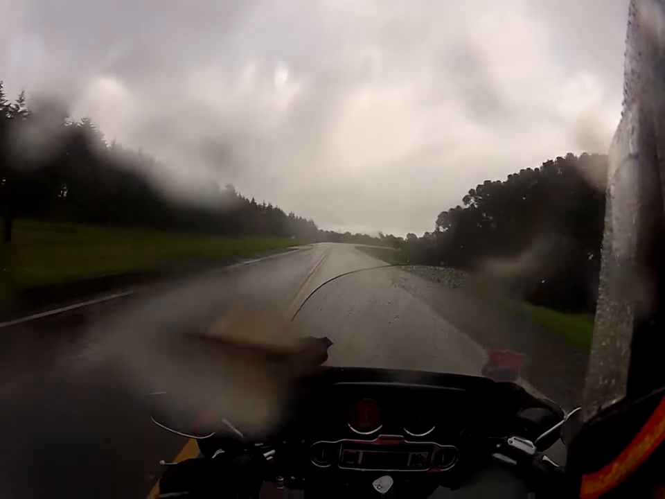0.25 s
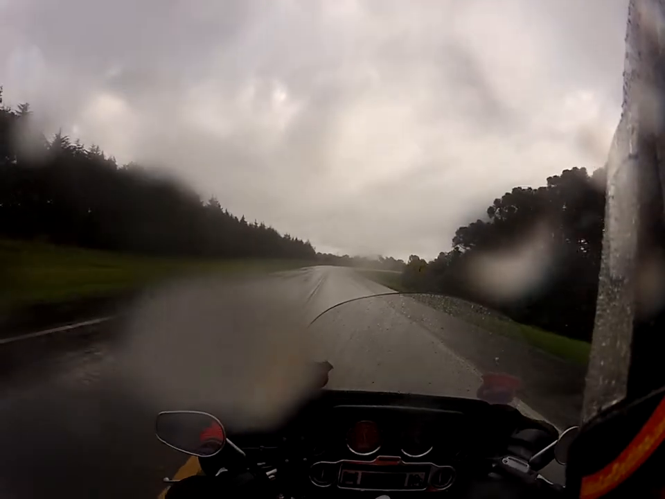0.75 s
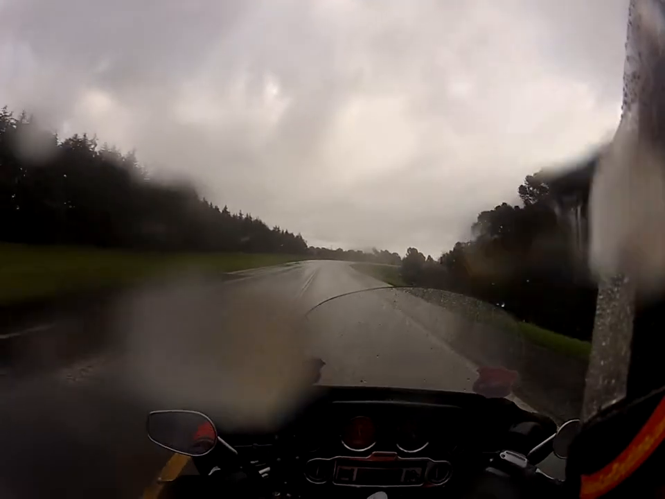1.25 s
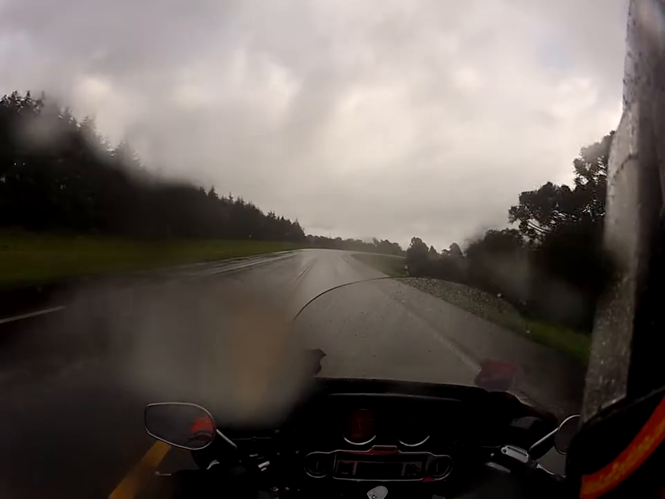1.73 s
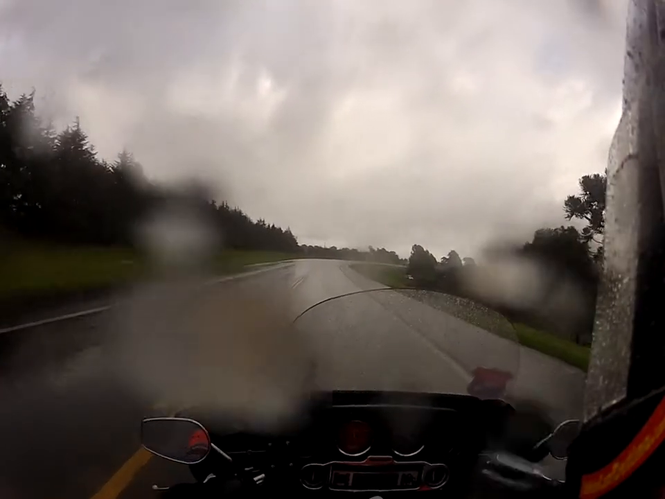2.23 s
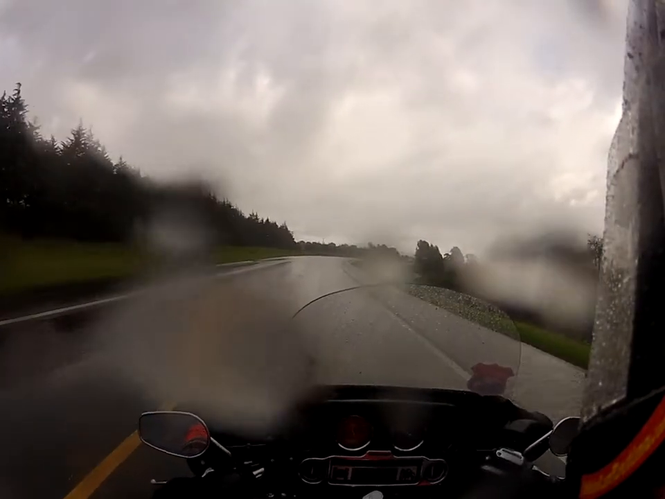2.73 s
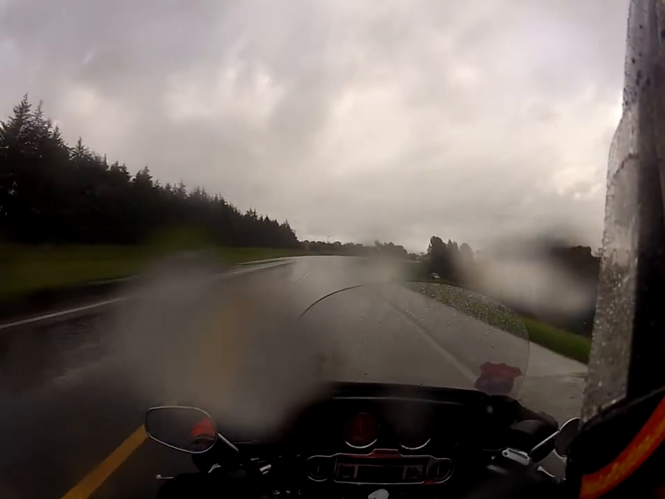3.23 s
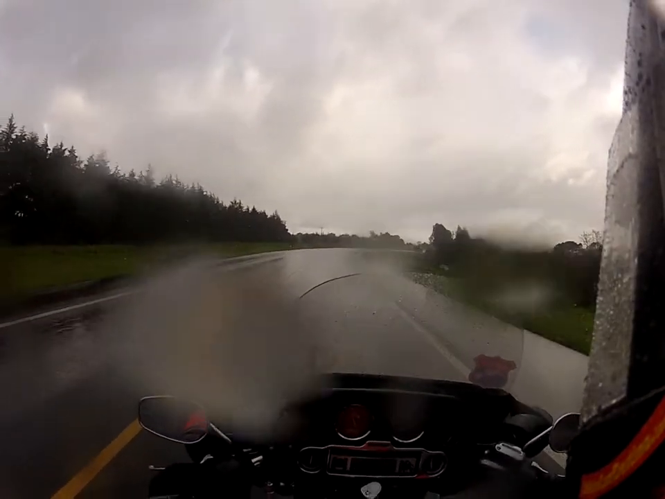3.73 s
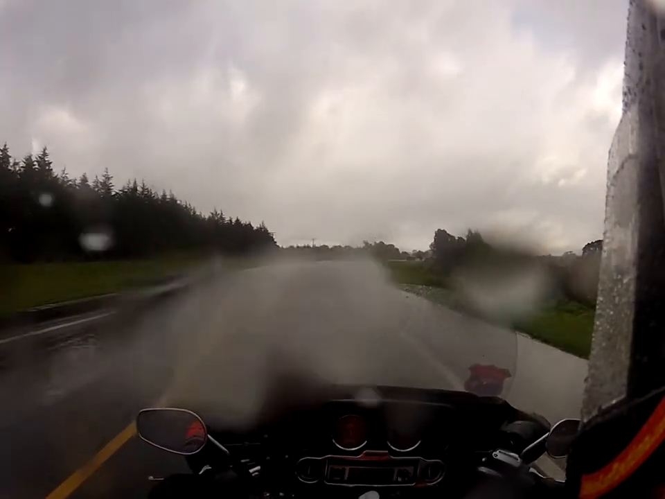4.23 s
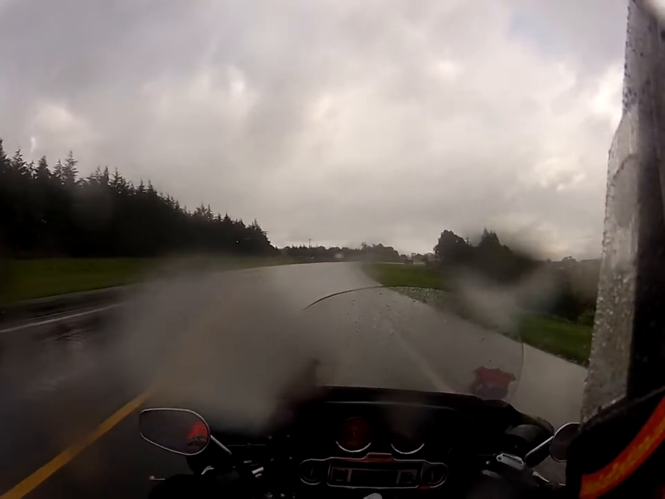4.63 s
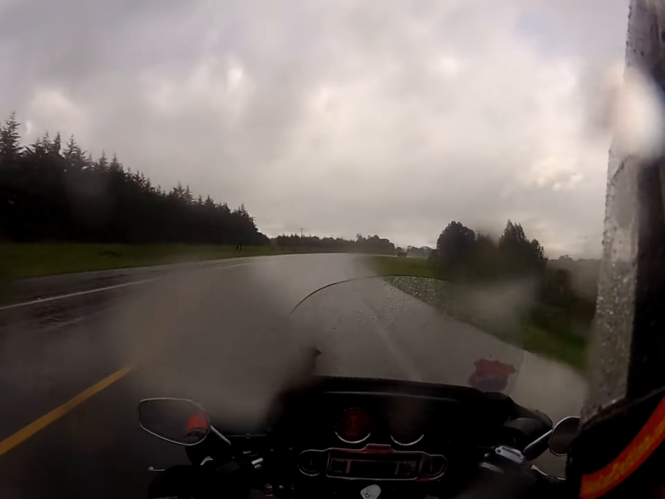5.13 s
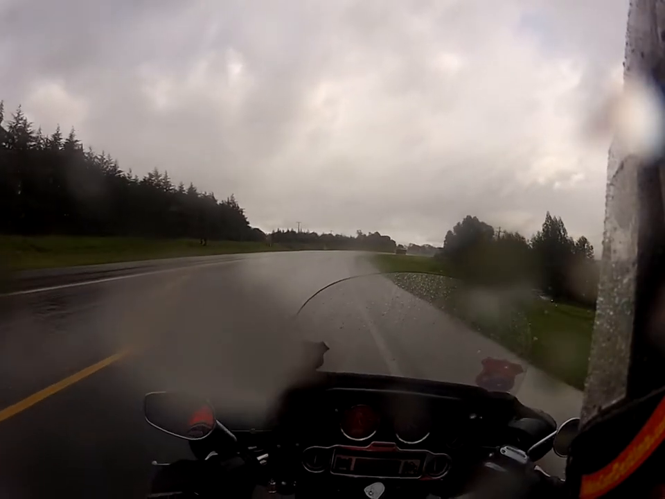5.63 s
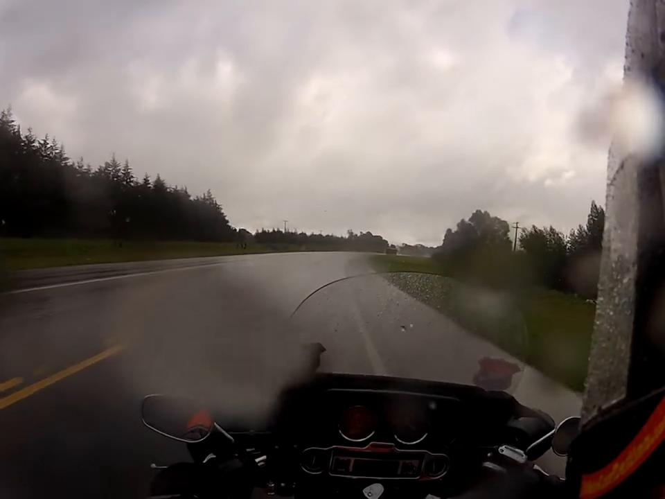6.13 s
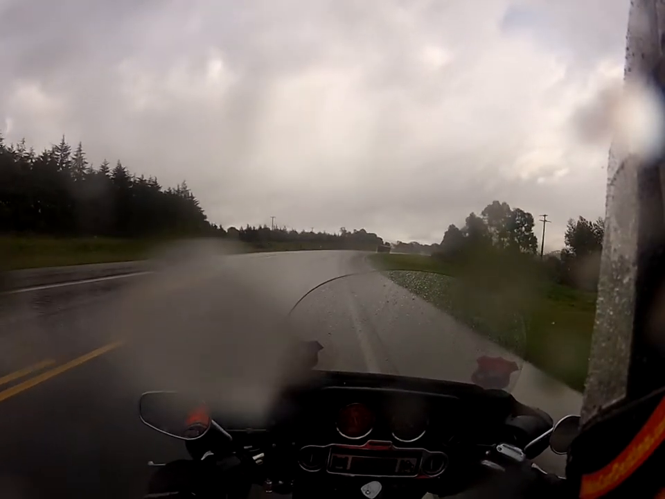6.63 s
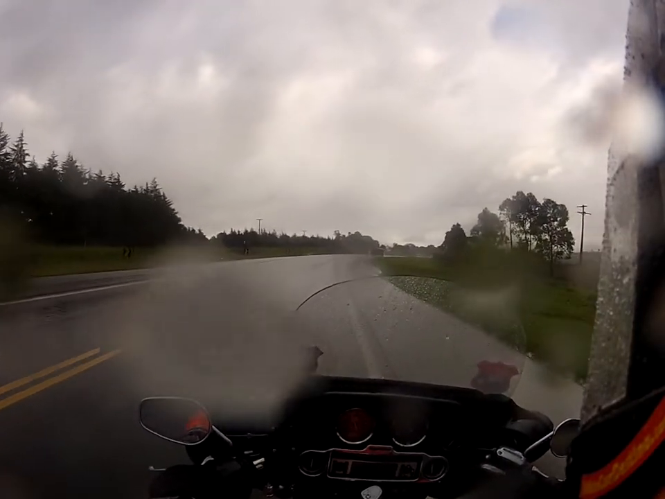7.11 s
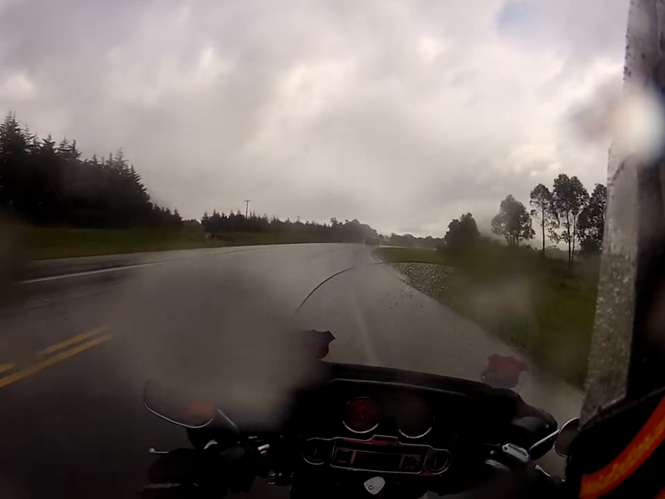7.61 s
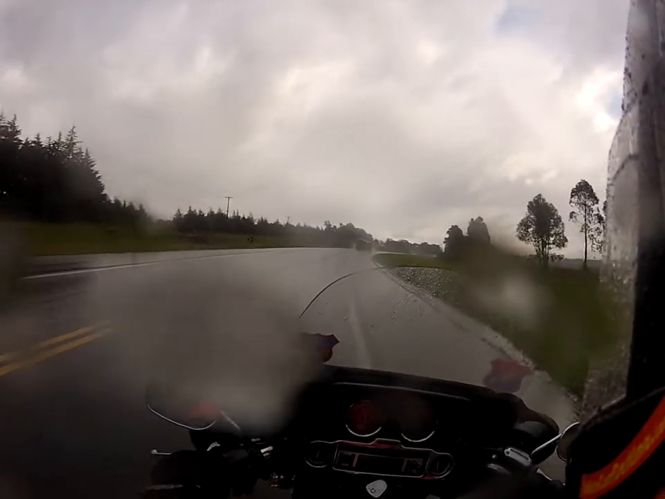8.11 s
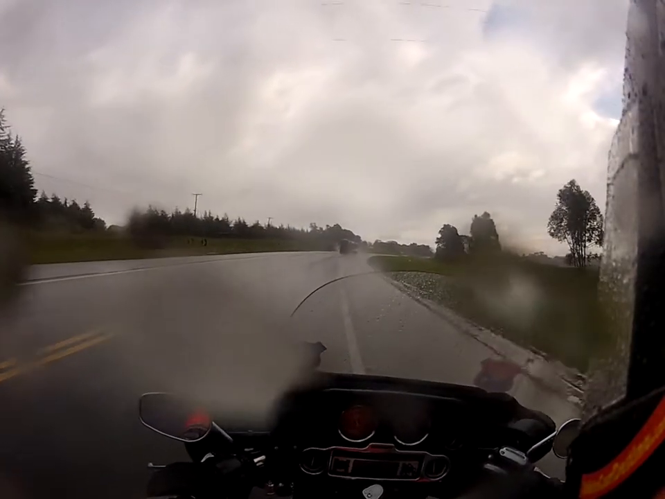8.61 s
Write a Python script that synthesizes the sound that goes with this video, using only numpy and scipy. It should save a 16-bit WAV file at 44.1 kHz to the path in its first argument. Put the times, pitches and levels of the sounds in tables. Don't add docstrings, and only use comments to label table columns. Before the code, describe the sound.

A big twin-cylinder motorcycle cruises on a wet open road, heard from a microphone sealed in a plastic case on the bike. Throughout, a low engine hum around 100 to 150 Hz sits with lumpy wind rumble, a deep 33 Hz fluttering throb, and steady spray hiss. From 0 to 2.5 s rain is dense: sharp hollow ticks, bright specks and dull mount knocks, with a violent slam at 1.2 s and a weaker one near 1.5. Engine load eases around 2 s and its pitch sinks slightly until 4 s. Hard slams hit at 2.8 and 3.25 s, each overload briefly ducking everything. Rain eases, picks up near 4 s, then thins after 5, leaving scattered taps and stronger engine drone. A small cluster of loud drops comes around 7.4 s; the ride continues to about 8.9 s. The tone is boxy, clipped and gritty.

```python
import sys
import numpy as np
from scipy import signal
from scipy.io import wavfile
from scipy.ndimage import uniform_filter1d

SR = 44100
rng = np.random.default_rng(int(sys.argv[2]) if len(sys.argv) > 2 else 0)


def log_audio(samples):
    frames = np.atleast_2d(samples).T
    limited = np.clip(frames, -1, 1)
    pcm = np.round(limited * 32767).astype(np.int16)
    wavfile.write(sys.argv[1], SR, pcm)


def gain_from_db(level_db):
    decades = np.asarray(level_db, float) / 20
    return 10 ** decades


N = 390726

# start_s [s], small_drops_db [dB]
RAIN_STRENGTH = [
    (0.0, -34.5),
    (2.3, -34.5),
    (2.9, -39),
    (3.9, -35.5),
    (4.9, -39),
    (6.9, -38),
    (8.86, -38.5),
]


def rms_one(x):
    return x / np.sqrt(np.mean(x ** 2) + 1e-20)


def in_time(rows):
    s, *columns = np.transpose(rows)
    return [np.interp(np.arange(N) / SR, s, column) for column in columns]


def drift(rate_hz):
    r = np.exp(-80 * np.pi * rate_hz / SR)
    slow = signal.lfilter([1], [1, -2 * r, r * r], rng.standard_normal(N // 40 + 2002))
    slow = rms_one(slow[2000:])
    return np.interp(np.arange(N) / 40, np.arange(len(slow)), slow)


def resonance(x, hz, width_hz):
    r = np.exp(-np.pi * width_hz / SR)
    poles = [1, -2 * r * np.cos(2 * np.pi * hz / SR), r * r]
    return signal.lfilter([(1 - r * r) / 2, 0, (r * r - 1) / 2], poles, x)


def modes(taps, table):
    out = 0
    for k, (hz, width_hz, db) in enumerate(table):
        out = out + gain_from_db(db) * (-1) ** k * resonance(taps + 1e-18, hz, width_hz)
    return out


def banded_noise(spectrum, patchy_db, shared, rate):
    hz, level_db = np.transpose(spectrum)
    edges = hz[1] * .7 * 2 ** np.arange(0, np.log2(hz[-2] / hz[1]) + 1, 1 / 3)
    out, together, white = 0, drift(rate), rng.standard_normal((2, N))
    for k, (low, high) in enumerate(zip(edges, edges[1:])):
        band_filter = signal.butter(2, [low, high], "band", fs=SR, output="sos")
        band = signal.sosfilt(band_filter, white[k % 2])
        centre_db = np.interp(np.log(low * high) / 2, np.log(hz), level_db)
        flicker_db = patchy_db * (shared * together + drift(rate))
        out = out + band * gain_from_db(centre_db + flicker_db)
    return rms_one(out)


def gusts():
    # peak_s [s], throb_db [dB], build_up_s [s], shedding_hz [Hz]
    gust_table = [(0.11, -20, 0.054, 32), (0.61, -15.5, 0.099, 32.24), (0.84, -19.9, 0.034, 32.2),
                  (1.0, -16.2, 0.036, 33.55), (1.14, -14, 0.039, 32), (1.3, -22, 0.091, 34.64),
                  (1.51, -14.5, 0.03, 33.2), (1.78, -17.5, 0.2, 33.1), (2.08, -24, 0.065, 32.5),
                  (2.35, -21.5, 0.12, 31.9), (2.64, -12, 0.097, 34.43), (3.0, -34, 0.033, 32.7),
                  (3.11, -20.5, 0.18, 33.45), (3.38, -21, 0.03, 35.87), (3.69, -23, 0.081, 33.24),
                  (3.93, -17.5, 0.043, 31.55), (4.23, -28, 0.12, 32.54), (4.63, -29.2, 0.32, 34.47),
                  (5.01, -23.5, 0.084, 37.62), (5.58, -25, 0.16, 33.14), (5.89, -22, 0.026, 32.54),
                  (6.1, -28, 0.1, 34.46), (6.45, -20, 0.063, 30.53), (6.72, -25, 0.074, 31.86),
                  (7.09, -18.5, 0.088, 35.3), (7.26, -18, 0.023, 34.83), (7.83, -21.3, 0.032, 33.7),
                  (8.05, -21, 0.22, 34.2), (8.4, -17.5, 0.11, 33.3), (8.69, -17.5, 0.024, 34.8)]
    collapse_share, lull_db = 0.73, -28.5
    peak_s, peak_db, build_s, shed_hz = np.transpose(gust_table)
    t = np.arange(0, N + 64, 64) / SR
    age = (t[:, None] - peak_s) / np.maximum(build_s, .02)
    age = np.where(age > 0, age / collapse_share, age)
    throb = (gain_from_db(peak_db) * np.exp(-age ** 2 / 2)).sum(axis=1) + gain_from_db(lull_db)
    rate_hz = np.interp(t, np.sort(peak_s), shed_hz)
    return in_time(np.transpose([t, rate_hz, 20 * np.log10(throb)]))


def wind():
    # pitch_hz [Hz], level_db [dB per Hz]
    rumble_colour = [(14, -34), (24, -6), (48, -4.5), (62, -6), (85, -12), (230, -22), (330, -27.5),
                     (425, -26.5), (600, -39.5), (750, -30.5), (1000, -86)]
    rumble_db = -27.5
    shed_hz, throb_db = gusts()
    turn = 2 * np.pi * np.cumsum(shed_hz * (1 + 0.0401 * drift(7.6))) / SR
    throb = np.sqrt(2) * np.sin(turn) * gain_from_db(throb_db + 2.7 * drift(9.7))
    swell_db = 0.13 * (throb_db - throb_db.mean())
    rumble = banded_noise(rumble_colour, patchy_db=2.0, shared=0.74, rate=14.2)
    return throb + gain_from_db(rumble_db + swell_db) * rumble


def engine():
    # start_s [s], cycle_hz [cycles per s]
    firing_cycle = [
        (0, 22.4),
        (1.2, 22.2),
        (2.0, 21.7),
        (3.2, 21.0),
        (4.0, 20.6),
        (5.6, 20.6),
        (7.2, 21.0),
        (8.86, 21.15),
    ]
    # [dB, level of the fifth multiple]
    engine_load = [
        (0.0, -35.5),
        (0.98, -35),
        (1.96, -43.5),
        (2.94, -38.5),
        (3.92, -38),
        (4.9, -35),
        (6.86, -34),
        (8.86, -34),
    ]
    # multiple [of the cycle], level_db [dB beside the load level]
    other_multiples = [(3, -1), (4, -6), (6, -15), (8, -14.5), (9, -11.5), (10, -12.5), (11, -14.5),
                       (12, -15), (14, -16.5), (20, -18.5)]
    (cycle_hz,), (fifth_db,) = in_time(firing_cycle), in_time(engine_load)
    seventh_db = fifth_db - 3.5
    turn = 2 * np.pi * np.cumsum(cycle_hz) / SR
    out = gain_from_db(fifth_db + 1.2 * drift(5)) * np.sin(5 * turn)
    out += gain_from_db(seventh_db + 1.2 * drift(5)) * np.sin(7 * turn)
    load_db = (fifth_db + seventh_db) / 2
    for multiple, db in other_multiples:
        wobble = rng.uniform(0, 2 * np.pi) + 0.36 * drift(3.7)
        out += gain_from_db(load_db + db + 3.5 * drift(7.5)) * np.sin(round(multiple) * turn + wobble)
    return np.sqrt(2) * out


def case(taps):
    # pitch_hz [Hz], width_hz [Hz], level_db [dB]
    shell_notes = [(1177, 105, 4.5), (1610, 258, 3), (2096, 270, 1.5), (2350, 194, 8), (2757, 330, -1.5),
                   (3594, 113, 5.5), (5140, 690, -21), (5270, 1350, -15.5)]
    return modes(taps, shell_notes)


def stray_drops():
    count = 95
    when, size, spot, width = rng.random(count), *rng.standard_normal((3, count))
    share = np.cumsum(gain_from_db(.6 * in_time(RAIN_STRENGTH)[0]))
    s = np.interp(when, share / share[-1], np.arange(N) / SR)
    peak_db = -18.5 + 2.5 * size
    hz = np.clip(2200 * 2 ** (0.38 * spot), 1100, 4500)
    length_s = 0.0015 * 2 ** (0.37 * width)
    return np.transpose([s, peak_db, hz, length_s])


def all_drops():
    # start_s [s], peak_db [dB], ring_hz [Hz], splash_s [s]
    big_drops = [(0.099, 0, 2200, 0.0023), (0.1175, -8, 2350, .0025), (0.3292, -6.5, 2210, 0.00058),
                 (0.552, -9.5, 2100, 0.0037), (0.7747, -3, 2450, 0.0016), (0.7951, -4, 1930, 0.0035),
                 (1.2146, -3, 2180, 0.0021), (1.3835, -8, 2220, .0018), (1.564, -12, 2500, 0.0033),
                 (1.5684, -4, 2316, 0.0026), (2.0836, -7.5, 2050, 0.0021), (2.2289, -8, 2580, 0.0021),
                 (2.5417, -7, 2110, 0.0009), (2.8933, -0.5, 2570, 0.003), (3.3921, -8, 2150, .0033),
                 (3.3999, -9.5, 2350, .001), (3.4228, -6, 2500, .0043), (3.6006, -5.5, 3960, 0.0019),
                 (3.7335, -11, 1580, 0.0026), (4.151, -4, 2195, 0.00063), (4.5521, -10, 1660, 0.0032),
                 (4.5754, -7, 2170, 0.00065), (4.6041, -9, 2600, 0.0048), (5.9515, -9.5, 2056, .0017),
                 (6.1812, -9.5, 2124, 0.0049), (7.3373, -9, 2500, 0.0029), (7.3992, -5.5, 2480, 0.0035),
                 (7.427, -3, 1950, 0.0051), (7.7191, -4, 1798, .0027), (8.0472, -5.5, 1990, 0.0027)]
    # start_s [s], peak_db [dB], ring_hz [Hz]
    lid_ticks = [(0.0089, -12, 1680), (0.0515, -11, 2500), (0.0872, -10, 2070), (0.4586, -8, 2240),
                 (0.528, -11.5, 1350), (0.7075, -10, 2440), (0.882, -10.5, 2410), (1.1045, -11.5, 2350),
                 (1.177, -12.5, 2427), (1.3492, -10, 2140), (1.786, -11.5, 2040), (2.0155, -11, 1344),
                 (2.217, -8.5, 2520), (2.731, -11.5, 2154), (2.7727, -12, 2110), (3.0048, -12.5, 1783),
                 (3.0469, -9, 2470), (3.3378, -10, 1956), (4.4211, -8.5, 2130), (4.658, -13, 2250),
                 (5.1916, -11.5, 1710), (5.3442, -12, 2013), (5.5654, -11, 1562), (5.9319, -9.5, 2570),
                 (6.4647, -11.5, 2030), (6.8592, -10.5, 1870), (7.1706, -11, 2080), (7.5941, -13.5, 1265),
                 (7.7857, -13.5, 1135), (8.445, -10, 2160)]
    # start_s [s], peak_db [dB]
    further_taps = [(0.2467, -11.5), (0.5076, -15.5), (0.5967, -14.5), (0.833, -10), (0.944, -15.5),
                    (1.1922, -16), (1.208, -18), (1.656, -12), (1.8673, -11.5), (2.0048, -13), (2.0946, -9.5),
                    (2.11, -11), (2.1745, -13.5), (2.3712, -13.5), (3.1541, -12), (3.614, -14), (3.663, -15.5),
                    (3.72, -13.5), (3.9519, -15.5), (3.982, -16), (4.3372, -12), (4.414, -14), (5.1157, -17),
                    (5.1375, -16), (5.311, -17), (5.72, -19), (6.0237, -16), (6.4336, -14), (7.3557, -19),
                    (7.662, -16)]
    # start_s [s], peak_db [dB]
    window_specks = [(0.255, -15), (0.657, -12.5), (0.79, -10), (0.917, -18), (1.6284, -11.5), (1.806, -12),
                     (1.9098, -9.5), (2.0424, -12), (2.1497, -12.5), (2.474, -13.5), (3.0398, -11),
                     (3.072, -14.5), (3.1455, -11), (3.2321, -16.5), (3.3094, -13.5), (3.7642, -12),
                     (3.855, -12), (4.3244, -12), (5.0569, -10), (5.779, -17), (5.8069, -14), (6.5491, -11),
                     (6.6723, -18.5), (6.7216, -14), (7.18, -12.5), (7.473, -18), (7.6377, -13.5),
                     (8.0022, -14.5), (8.3933, -18), (8.824, -16.5)]
    shell_drops = list(big_drops)
    shell_drops += [(*tick, 0.0023) for tick in lid_ticks]
    shell_drops += [(*tap, 2246, 0.0026) for tap in further_taps]
    shell_drops += list(stray_drops())
    rows = []
    for s, db, hz, length_s in shell_drops:
        bright_db = -8 + 5 * np.log2(max(length_s, 3e-4) / 0.0033)
        rows.append((s, db, hz, bright_db, length_s))
    return rows + [(*speck, 3630, -5, 0.0033) for speck in window_specks]


def large_drops():
    rows = all_drops()
    out, t = np.zeros(N + 2048), np.arange(1024) / SR
    splatter = rng.standard_normal((len(rows), 2, len(t)))
    crisp = signal.butter(2, [3000, 5800], "band", fs=SR, output="sos")
    for (s, peak_db, hz, bright_db, length_s), (noise, chance) in zip(rows, splatter):
        splash_s = max(length_s, 3e-4)
        blow = 0.56 * noise * np.exp(-(t / (1.3 * splash_s)) ** 2) * (chance > .6)
        blow[0] += 2.1
        body = rms_one(case(blow)) + 0.87 * rms_one(resonance(blow, hz, 0.065 * hz))
        body = rms_one(body) + gain_from_db(bright_db + 0.5) * rms_one(signal.sosfilt(crisp, blow))
        body *= np.exp(-t / (1.43 * splash_s))
        at = round(s * SR)
        out[at:at + len(t)] += gain_from_db(peak_db + 1.5) * body / np.abs(body).max()
    return out[:N]


def slams():
    # start_s [s], blow_db [dB above full scale]
    heavy_drops = [
        (1.2191, 8.5),
        (1.4762, -1),
        (2.7907, 6.5),
        (3.2535, 7),
    ]
    # pitch_hz [Hz], level_db [dB], fade_s [s to fall 60 dB]
    cavity_notes = [(2140, 0, .018), (1860, -2, .017), (3630, -17, .024), (1300, -14, .012)]
    out, t = np.zeros(N), np.arange(2048) / SR
    ring = 0
    for k, (hz, db, fade_s) in enumerate(cavity_notes):
        ring = ring + (-1) ** k * gain_from_db(db - 60 * t / fade_s) * np.sin(2 * np.pi * hz * t)
    for s, blow_db in heavy_drops:
        at = round(s * SR)
        splat = np.exp(-t / 0.0024) * resonance(rng.standard_normal(len(t)), 4700, 4400)
        out[at:at + len(t)] += gain_from_db(blow_db) * (ring + gain_from_db(-7.5) * splat)
    return out


def thuds():
    # start_s [s], peak_db [dB]
    knocks = [(0.095, -12), (0.527, -11.5), (1.216, -26), (1.465, -32), (1.566, -15.5), (2.453, -37),
              (2.509, -15.5), (2.787, -19), (2.969, -24), (3.113, -20), (3.25, -23), (3.697, -15),
              (3.94, -19), (4.35, -24), (5.021, -37), (5.55, -28), (7.429, -26)]
    # pitch_hz [Hz], width_hz [Hz], level_db [dB]
    mount_notes = [(112, 37, 1), (221, 120, -4.5), (396, 79, -3.5)]
    s, peak_db = np.transpose(knocks)
    taps = np.zeros(N)
    taps[(s * SR).astype(int)] = -gain_from_db(peak_db + 42.5)
    r = np.exp(-1 / (0.00057 * SR))
    return modes(signal.lfilter([1 - r], [1, -r], taps), mount_notes)


def rain():
    # pitch_hz [Hz], level_db [dB per Hz]
    spray_colour = [(350, -28), (500, -11), (880, -11), (1180, 0), (1400, -10), (2250, 4), (2900, -20),
                    (3600, 14), (4300, -42.5), (5200, -4.5), (5800, -20), (6500, -45)]
    spray_db = -35
    small_db, = in_time(RAIN_STRENGTH)
    sizes = gain_from_db(5.3 * np.minimum(rng.exponential(1, N), 3))
    born = rng.random(N) < 220 * gain_from_db(3 * drift(8)) / SR
    fade = np.exp(-1 / (0.00078 * SR))
    splash = signal.lfilter([1], [1, -fade], sizes * born) * rng.standard_normal(N)
    patter = rms_one(case(splash)) + gain_from_db(-3.5) * rms_one(resonance(splash, 3550, 3800))
    hiss = banded_noise(spray_colour, patchy_db=1.32, shared=1.6, rate=34)
    return gain_from_db(small_db) * rms_one(patter) + gain_from_db(spray_db - 1.0) * hiss


def scene():
    return (wind() + engine() + large_drops() + thuds() + rain() + slams())[None]


def roll_off(x):
    return signal.sosfilt(signal.butter(12, 16530, fs=SR, output="sos"), x)


def record(dry):
    stream_hz = 12000
    overload = uniform_filter1d(dry[0] ** 2, size=130) > .7
    climb_db = 110 * np.arange(N) / SR
    duck_db = np.maximum.accumulate(10.6 * overload + climb_db) - climb_db
    late_db = np.roll(duck_db, round(.0035 * SR))
    r = np.exp(-1 / (.0015 * SR))
    x = dry[0] * gain_from_db(-signal.lfilter([1 - r], [1, -r], late_db))
    x = np.clip(x, -.7, .78)
    x = signal.sosfilt(signal.cheby1(8, .5, 5800, fs=SR, output="sos"), x)
    stream = signal.resample_poly(x, stream_hz // 300, SR // 300, window=("kaiser", 8.))
    stairs = np.repeat(stream, 4)
    held = signal.resample_poly(stairs, SR // 300, 4 * stream_hz // 300)[:N]
    held = np.pad(held, (0, N - len(held)))
    return roll_off(held[None])


dry = scene()
out = record(dry)
log_audio(out)
```